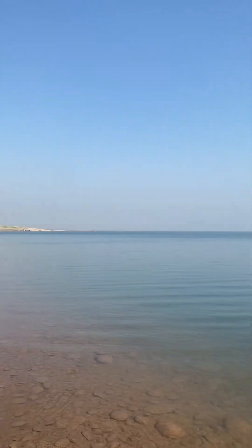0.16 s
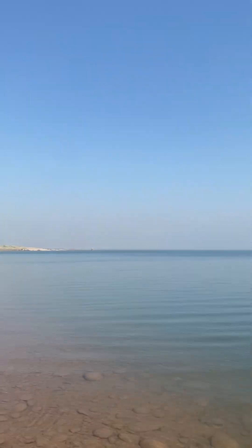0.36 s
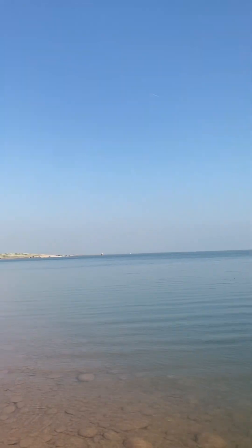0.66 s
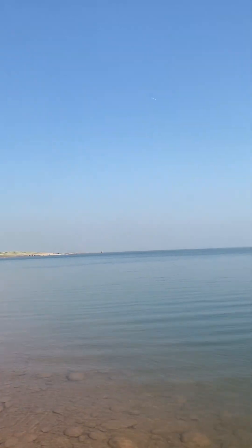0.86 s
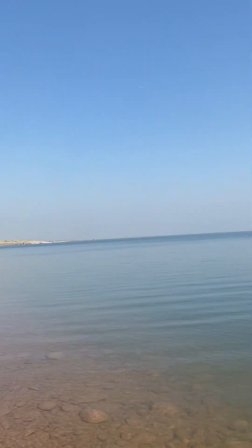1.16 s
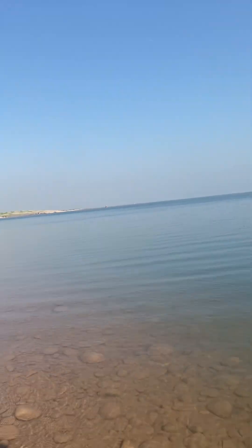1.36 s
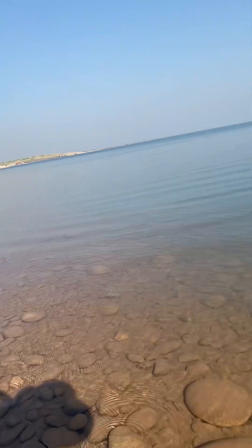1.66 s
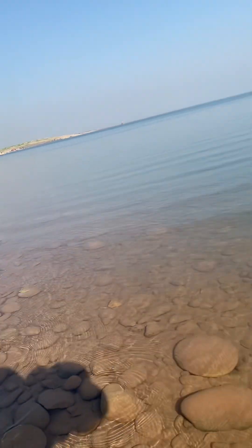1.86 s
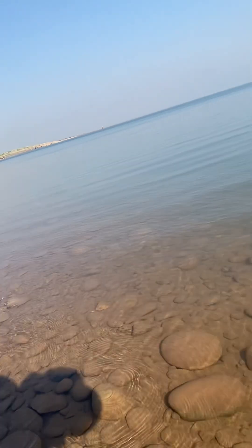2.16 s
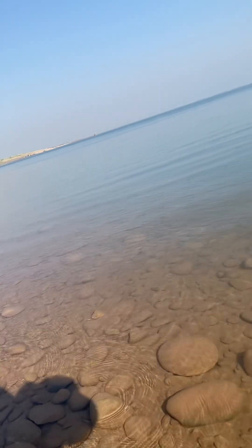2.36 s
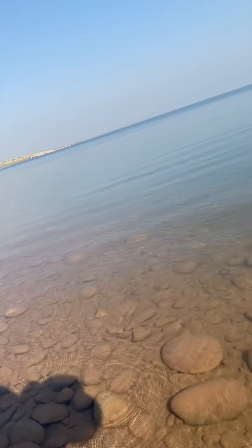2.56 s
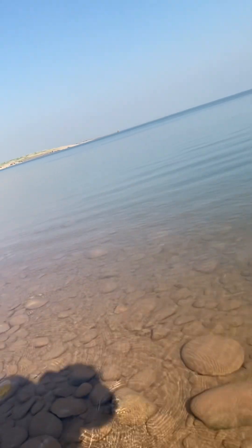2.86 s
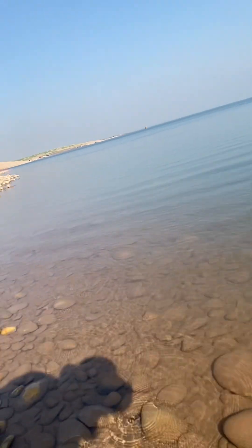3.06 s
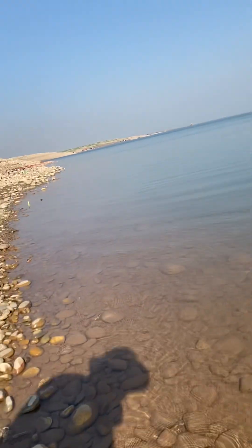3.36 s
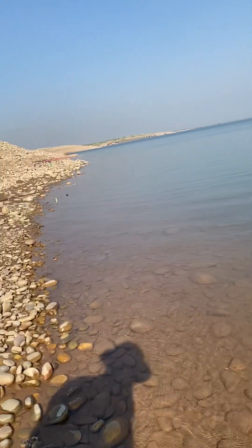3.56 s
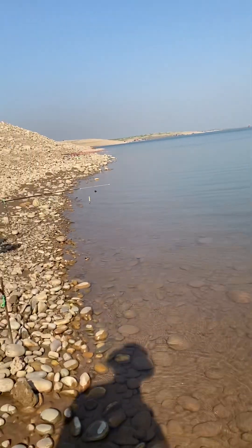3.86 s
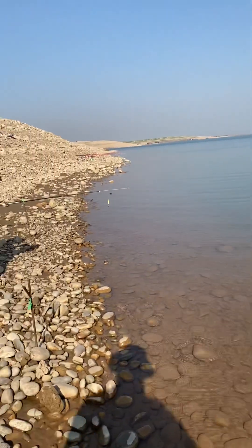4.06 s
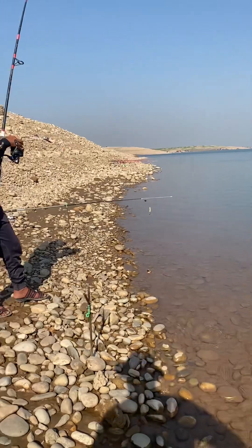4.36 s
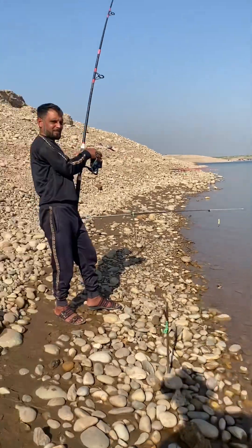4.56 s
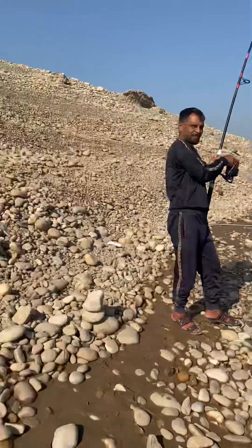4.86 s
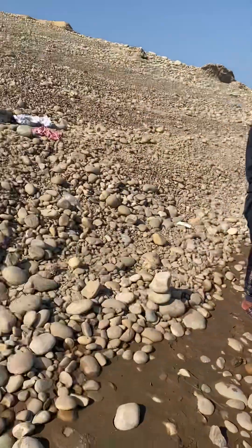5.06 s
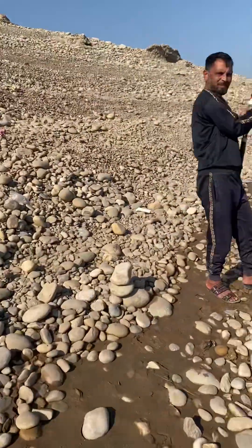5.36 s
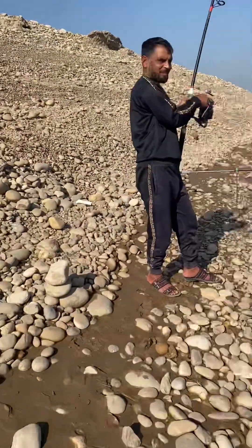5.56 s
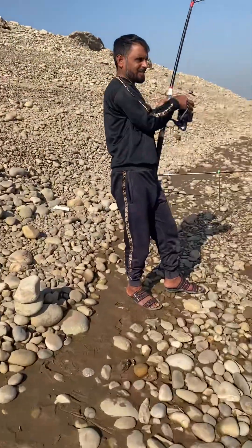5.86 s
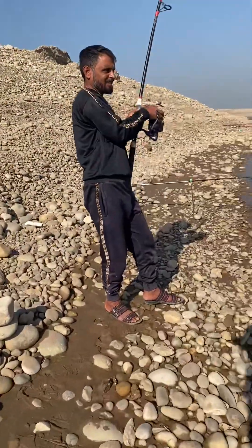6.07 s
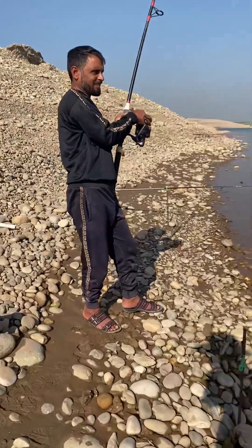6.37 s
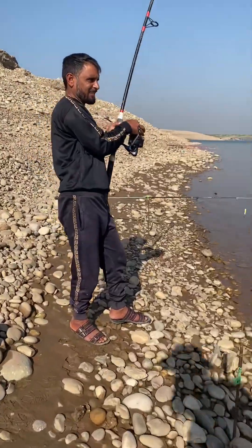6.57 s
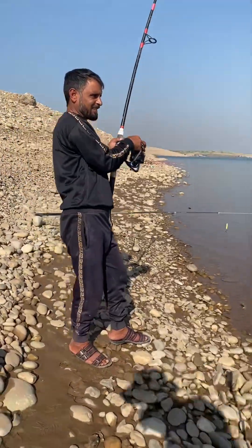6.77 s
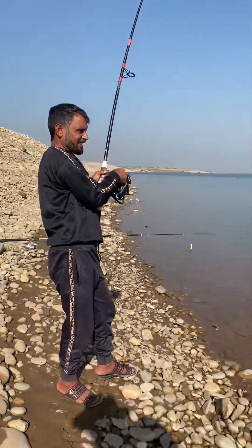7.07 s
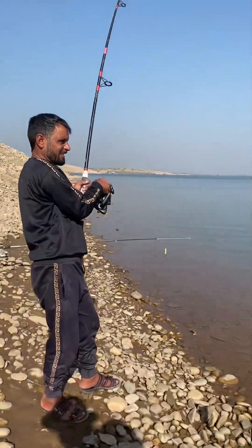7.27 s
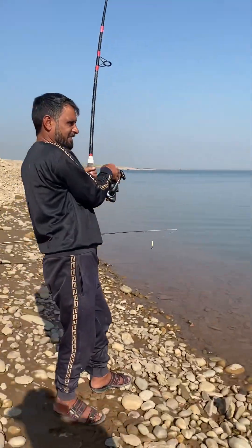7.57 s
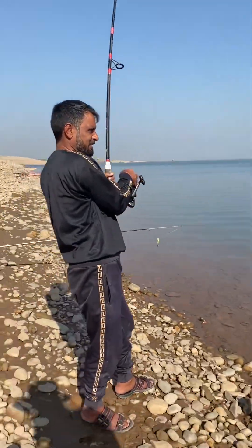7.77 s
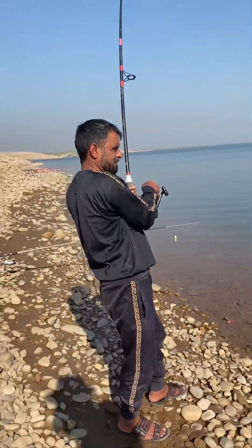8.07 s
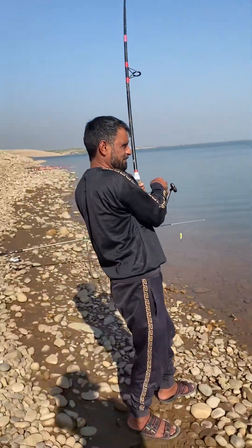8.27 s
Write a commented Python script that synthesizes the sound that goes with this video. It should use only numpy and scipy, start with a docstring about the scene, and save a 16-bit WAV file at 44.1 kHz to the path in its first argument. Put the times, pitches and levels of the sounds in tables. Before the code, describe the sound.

Close by, a fishing reel ticks in a rapid metallic ratchet that slows and speeds up while feet stir shallow water and stones knock. The clicking stops, leaving thin wavering squeaks and a low breeze. Splashing steps and plops follow, then crunching shingle with loud stone clacks as the reel winds again, longer and quicker. Outdoors on a quiet lakeshore, hand-held phone microphone with soft wind rumble.

```python
"""Fishing reel on a pebble lakeshore

The ratchet of a reel ticks in two short goes, later in a long quicker one: each tooth strikes ringing modes.
Feet wade out of the shallows (swarms of bubbles, spray, plops) and crunch over shingle (many tiny taps).
Single stones clack as short modes or grate in jerks, dull sounds thud as damped tones with noise,
and thin squeaks come and go as wavering tones; faint bright sizzles are unevenly pattering noise.
A light breeze, made of filtered noise, rumbles on the two ports of a hand-held phone.
"""
import sys
import numpy as np
from scipy import signal
from scipy.fft import rfft, irfft, next_fast_len
from scipy.io import wavfile
from scipy.ndimage import uniform_filter1d

SR = 44100
rng = np.random.default_rng(int(sys.argv[2]) if len(sys.argv) > 2 else 0)


def persist_wave(psi):
    """Save psi, clipped to +-1, as 16-bit WAV."""
    counts = np.round(np.clip(psi, -1, 1) * 32767).astype(np.int16)
    wavfile.write(sys.argv[1], SR, np.atleast_2d(counts).T)


N = 371763
TIME = np.arange(N) / SR  # seconds

# How the body of the reel rings, as pairs of close tones.
# Each row: middle of the pair in Hz, width in Hz, average relative level in dB.
REEL_MODES = [(1020, 89, 9), (1316, 47, 7), (2200, 510, 6), (3110, 120, 8.5), (4110, 520, 12),
              (5370, 660, 8.5), (7170, 970, 3.5), (9670, 314, 14), (10310, 1900, 12), (12800, 1600, 7.5),
              (15040, 330, 6)]


def reel(level_db=1.0, snap_t60=0.014, bounce_s=0.0044, bounce_db=-9, body_t60=0.17, body_db=-22,
         steady=0.36, loose=0.51, colour_db=1.7, split=0.34):
    """The pawl drops over each tooth: a sharp snap, one small bounce, then the housing rings on."""
    teeth = ratchet() * undb(level_db)
    t = TIME[:SR // 8]
    bounce = undb(bounce_db) * (t > bounce_s) * fade(np.abs(t - bounce_s), snap_t60)
    decay = fade(t, snap_t60) + bounce + undb(body_db) * fade(t, body_t60)

    # every tooth sounds much the same, but the loose pawl chatters differently each time
    alike = signal.fftconvolve(teeth[None], noise(len(t), 0.078) * decay)[:, :N]
    chatter = signal.fftconvolve(teeth, decay)[:N] * noise(N, 0.53)
    blows = steady * alike + loose * chatter

    # the modes come in close pairs, split by a share of their width; each tooth favours other ones
    tooth = np.cumsum(teeth != 0)
    ring = 0
    for hz, width, db in REEL_MODES:
        for side in (-1, 1):
            favour = undb(db + colour_db * rng.standard_normal(tooth[-1] + 1))
            mode = resonate(blows, hz + side * split * width, width)
            ring = ring + side * favour[tooth] * mode / 2

    # so small a body radiates no bass
    return signal.sosfilt(signal.butter(2, 850, "high", fs=SR, output="sos"), ring)


# The handle is nudged by a single tooth.
# Each row: start in seconds, relative level in dB.
NUDGES = [(0.9562, -39), (2.2366, -39.5), (2.327, -42.5), (2.4368, -54.5), (2.7565, -47.5), (3.1084, -43.5),
          (5.494, -40), (6.2657, -38.5), (6.348, -36.5)]
# The reel is wound in three goes, each a curve.
# Each row: time in seconds, teeth per second, relative level of a tooth in dB.
FIRST_WIND = [(0.01, 53.5, -39.0), (0.137, 37.5, -36.0), (0.301, 30.9, -34.0), (0.422, 10.7, -37.0),
              (0.661, 15.4, -36.0), (0.704, 33.0, -38.0), (0.734, 22.9, -39.0), (0.881, 20.9, -40.0)]
SLOW_WIND = [(0.987, 16.9, -38.0), (1.049, 14.7, -37.0), (1.288, 34.8, -37.0), (1.46, 13.4, -39.0)]
QUICK_WIND = [(6.7, 15.2, -35.0), (6.784, 23.0, -33.0), (7.004, 81.6, -37.5), (7.102, 60.8, -36.5),
              (7.371, 51.7, -37.5), (7.553, 32.4, -40.5), (7.67, 32.8, -41.5), (7.857, 59.9, -41.0),
              (8.051, 20.0, -45.0)]
TOOTH_SCATTER_DB = 0.8  # how unequal the blows of a winding are
PAWL_FALL_S = .0007  # from the tip of a tooth to the blow


def ratchet():
    """One blow for each tooth that passes the pawl: the faster the handle, the closer the blows."""
    teeth = np.zeros(N)
    for start, db in NUDGES:
        teeth[int(start * SR)] += undb(db)
    for go in (FIRST_WIND, SLOW_WIND, QUICK_WIND):
        turning = (TIME >= go[0][0]) & (TIME < go[-1][0])
        teeth_passed = np.cumsum(curve(go) * turning) / SR
        drops = np.flatnonzero(np.diff(np.ceil(teeth_passed)))
        scatter_db = TOOTH_SCATTER_DB * rng.standard_normal(len(drops))
        teeth[drops + int(PAWL_FALL_S * SR)] += undb(curve(go, column=2)[drops] + scatter_db)
    return teeth


# A leg pushes through the shallows.
# Each row: height of the push in seconds, relative level in dB, length in seconds.
STRIDES = [(0.4, -60.5, 0.25), (0.54, -54, 0.33), (1.05, -55, 0.092), (1.33, -55.5, 0.64),
           (2.1, -70.5, 0.42), (4.16, -66.5, 0.33), (4.36, -61.5, 0.14), (4.86, -50, 0.31),
           (5.11, -54, 0.21), (5.35, -47, 0.21), (5.5, -55, 0.26), (5.92, -65.5, 0.56), (6.25, -61.5, 0.31)]
# The colour of stirred water and spray.
# Each row: frequency in Hz, relative gain in dB.
SPRAY = [(150, -3), (350, 3), (700, -6), (1500, -2), (2100, 0.5), (3000, -7), (4200, -1), (5800, -2),
         (8000, -9.5), (13000, -10.5), (16000, -28)]


def wading(cycles=24, spray_db=-2, patter_db=3.0, low_hz=560, high_hz=4000, count=2600):
    """Stirred water: a swarm of small bubbles, the smaller the shorter, under pattering spray."""
    swarm = np.zeros((2, N))
    for when, pitch in rng.random((count, 2)):
        hz = low_hz * (high_hz / low_hz) ** pitch
        add(swarm, when * N / SR, bubble(hz, cycles / hz) * np.sqrt(hz / low_hz))

    # spray lands in uneven splashes a few milliseconds long
    unevenness = unit(uniform_filter1d(rng.standard_normal(N), size=180))
    patter = undb(patter_db * unevenness)
    spray = unit(colour(noise(N, 0.021) * patter, SPRAY)) * undb(spray_db)
    push = swells(STRIDES, rise_share=0.53, edge_db=13.5, roundness=1.28)
    return unit(unit(colour(swarm, SPRAY)) + spray) * push


def bubble(hz, t60, rise=0.26, port_spread=1.0):
    """A bubble rings and rises in pitch as it nears the surface."""
    t = TIME[:int(t60 * SR)]
    phase = 2 * np.pi * np.cumsum(hz * (1 + rise * t / t60)) / SR
    tone = np.sin(phase + port_spread * rng.standard_normal((2, 1)))
    return tone * fade(t, t60) * (1 - np.exp(-t * hz))


# Bubbles around the feet in the shallows.
# Each row: start in seconds, relative level in dB, starting pitch in Hz.
BUBBLES = [(0.518, -41, 1415), (1.053, -40, 1415), (1.154, -33.5, 503), (1.221, -37, 473),
           (1.352, -46, 760), (1.467, -43.5, 1245), (1.484, -48, 2450), (1.6, -51, 790), (1.626, -54, 2660),
           (1.63, -46.5, 674), (2.413, -56.5, 1570), (4.145, -51.5, 1370), (4.557, -44, 760),
           (4.582, -43.5, 1160), (4.603, -39.5, 657), (4.628, -45, 2390), (4.770, -40, 1860),
           (5.129, -50, 1800), (5.143, -38, 1520), (5.453, -41, 1900), (5.5, -37, 1934),
           (5.857, -39.5, 1300), (5.873, -50, 2440), (5.987, -53, 2690), (6.012, -49, 1710),
           (6.064, -45, 1630), (6.199, -51, 3840)]
PLOP_T60_S = 0.06  # ring time of a 1 kHz bubble; it shortens with the root of the pitch


def bubbles(level_db=2, rise=0.367, gurgle=0.4):
    """The larger single plops: the lower, the longer they ring; the moving water makes them gurgle."""
    out = np.zeros((2, N))
    for start, db, hz in BUBBLES:
        plop = bubble(hz, PLOP_T60_S * np.sqrt(10 ** 3 / hz), rise)
        flutter = unit(uniform_filter1d(rng.standard_normal(plop.shape[-1]), size=110))
        swell = 1 - np.exp(-TIME[:len(flutter)] * hz / 2)
        add(out, start, plop * swell * (1 + gurgle * flutter) * undb(db + level_db))
    return out


# Faint bright sizzle: high overtones and ticks of the squeaks at 2 s, later fine drops.
# Each row: loudest moment in seconds, relative level in dB, length in seconds.
SIZZLES = [(2.08, -76.5, 0.89), (4.845, -56, .05), (5.33, -61.5, 0.52)]


def bright_sizzle(patter_db=5.0):
    """Treble of the squeaks at 2 s and of later fine drops: high-passed noise with an uneven patter."""
    unevenness = unit(uniform_filter1d(rng.standard_normal(N), size=90))
    pattering = noise(N, 0.14) * undb(patter_db * unevenness)
    sizzle = signal.sosfilt(signal.butter(4, 8500, "high", fs=SR, output="sos"), pattering)
    return unit(sizzle) * swells(SIZZLES, rise_share=0.29, edge_db=13, roundness=2.0)


# A sole presses or drags on the shingle.
# Each row: moment of the greatest weight in seconds, relative level in dB, length in seconds.
SCUFFS = [(4.59, -65, 0.28), (4.76, -53, 0.54), (6.605, -53, 0.083), (6.9, -55.5, 0.73), (7.44, -49, 0.076),
          (7.495, -41.5, 0.038), (7.56, -49.5, 0.064), (7.66, -47, 0.2), (7.695, -44, 0.022), (7.8, -59, 1),
          (8.225, -49, 0.13), (8.295, -53, 0.097), (8.42, -46.5, 0.049)]
# The colour of the crunching stones and sand.
# Each row: frequency in Hz, relative gain in dB.
SHINGLE = [(150, -1), (350, 2), (650, -3), (1100, -3), (1900, -1.5), (3000, -11.5), (3900, -8.5),
           (6000, -18), (8000, -30), (10000, -22.5), (16000, -32)]


def shingle(per_second=700, spread_db=5.5, sand_db=-5, count=14):
    """Many small pebbles of all sizes tap each other, with sand scraping between them."""
    taps = np.zeros((2, N))
    t = TIME[:SR // 30]
    for hz in np.geomspace(600, 6000, count):
        hits = rng.random(N) < per_second / count / SR
        sizes = undb(spread_db * np.minimum(rng.exponential(size=N), 3.5))
        burst = noise(len(t), 0.6) * fade(t, 0.027)
        tap = unit(burst) + unit(resonate(burst, hz, hz / 9)) * np.sqrt(hz / 3000)
        taps += signal.oaconvolve((hits * sizes)[None], tap)[:, :N]
    sand = unit(colour(noise(N, 0.37), SHINGLE))
    weight = swells(SCUFFS, rise_share=0.4, edge_db=11.0, roundness=1.26)
    return unit(unit(colour(taps, SHINGLE)) + undb(sand_db) * sand) * weight


# Stones knocked together; the softer the contact, the lower the top frequency.
# Each row: start in seconds, relative level in dB, basic pitch in Hz, top frequency in Hz.
KNOCKS = [(0.453, -28.5, 1934, 5330), (0.479, -34, 1870, 4200), (1.15, -29, 2260, 5330),
          (1.177, -42, 1300, 2200), (4.811, -36, 1400, 3000), (4.84, -37, 1340, 5240),
          (4.924, -40, 1910, 3000), (5.076, -39, 4080, 5500), (5.235, -36.5, 3210, 4290),
          (5.318, -38, 3020, 3800), (5.352, -32, 2180, 5500), (5.371, -34.5, 1810, 4830),
          (5.823, -43.5, 2430, 4500), (5.856, -37.5, 1320, 2190), (6.258, -46, 1410, 2490),
          (7.4306, -21, 1800, 2200), (7.4408, -14, 1900, 2400), (8.2912, -13.5, 1712, 4800),
          (7.534, -35, 2000, 2300), (7.749, -25.5, 1970, 1950), (8.178, -34.5, 1870, 5400),
          (8.221, -34.5, 1540, 4200), (8.252, -34, 1850, 4500), (8.279, -47, 1820, 4600),
          (8.4, -38.5, 1880, 5070)]


def stones(level_db=-1):
    """The louder single knocks; a soft contact takes the top off."""
    out = np.zeros((2, N))
    for start, db, hz, top_hz in KNOCKS:
        contact = signal.butter(3, top_hz, fs=SR, output="sos")
        add(out, start, signal.sosfilt(contact, clack(hz)) * undb(db + level_db))
    return signal.sosfilt(signal.butter(6, 5800, fs=SR, output="sos"), out)


# How a pebble rings.
# Each row: multiple of its basic pitch, relative level in dB, time to fade by 60 dB in seconds.
PEBBLE_MODES = [(.64, 0.5, 0.01), (1, 7.5, 0.015), (1.28, -2, 0.026), (1.72, 10.5, 0.0018),
                (2.12, 12.5, 0.0054), (2.9, 3, 0.0057)]


def clack(hz, grit_db=-9, grit_t60=0.049, bed_db=-27, bed_t60=0.062):
    """One pebble struck: a few short modes, grit at the contact, a faint rattle of its neighbours."""
    t = TIME[:SR // 10]
    ring = 0
    for multiple, db, t60 in PEBBLE_MODES:
        pitch = hz * multiple * (1 + 0.02 * rng.standard_normal())
        phase = 2 * np.pi * pitch * t + .3 * rng.standard_normal((2, 1))
        ring = ring + undb(db) * fade(t, t60) * np.sin(phase)
    grit = unit(resonate(resonate(noise(len(t), 0.73), 2370, 2100), 2200, 3600))
    grit_decay = undb(grit_db) * fade(t, grit_t60) + undb(bed_db) * fade(t, bed_t60)
    return (ring / 2 + grit * grit_decay) * (1 - np.exp(-t / 0.00056))


# One stone drags over another.
# Each row: start in seconds, relative level in dB, pitch in Hz, length of the drag in seconds.
GRATES = [(2.07, -68, 2480, 0.081), (2.211, -57, 2700, 0.0058), (5.113, -50.5, 2930, 0.014),
          (5.352, -35, 3680, 0.0051), (7.422, -37, 1470, 0.018), (7.647, -38.5, 3840, 0.028),
          (7.658, -41, 1030, 0.036), (8.392, -41.5, 3560, 0.023)]


def grates(level_db=-2, per_second=260, slip_t60=0.018, width=0.24, tail_t60=0.093):
    """One stone drags over another in quick jerks that ring it in a broad band."""
    out, t = np.zeros((2, N)), TIME[:SR // 8]
    for start, db, hz, length in GRATES:
        rub = noise(len(t), 0.74) * slips(len(t), per_second, slip_t60, scatter_db=-6)
        ring = unit(resonate(resonate(rub, hz, width * hz), hz, width * hz))
        push = np.minimum(t / (0.5 * length), 1) * fade(np.maximum(t - length, 0), tail_t60)
        add(out, start, undb(db + level_db) * ring * push)
    return out


# Low dull sounds: thuds of feet, a deep wind buffet at 4.45 s, a water plop at 4.91 s.
# Each row: start in seconds, relative level in dB, pitch in Hz, time to fade by 60 dB in seconds.
DULL_SOUNDS = [(1.254, -37.5, 67, 0.2), (1.414, -38.5, 73, 0.12), (1.579, -44, 62, 0.086),
               (4.414, -32, 52, 0.15), (4.451, -45, 37.5, 0.2), (4.908, -43, 550, 0.023),
               (4.966, -28.5, 210, 0.014), (4.964, -46, 667, 0.025), (6.04, -50, 270, 0.07),
               (7.434, -41.5, 335, 0.074), (7.659, -48.5, 430, 0.09), (8.294, -40, 219, 0.06)]


def dull_sounds(rough=1.0):
    """Foot thuds, one wind buffet and one plop: a damped tone mixed with noise around the same pitch."""
    out, t = np.zeros((2, N)), TIME[:SR // 3]
    for start, db, hz, t60 in DULL_SOUNDS:
        rumble = unit(resonate(resonate(noise(len(t), 0.18), hz, hz), hz, hz))
        body = np.sin(2 * np.pi * hz * t) + rough * rumble
        onset = 2 * (1 - np.exp(-t * hz))
        add(out, start, undb(db) * body * fade(t, t60) * onset)
    return out


# Short squeaks.
# Each row: start in seconds, relative level in dB, middle pitch in Hz, length in seconds,
# roughness from 0 to 1 (anything higher counts as 1).
SQUEAKS = [(1.987, -53, 3260, 0.013, 0.4), (2.003, -46.5, 3710, 0.026, 0.45),
           (2.025, -43.5, 3780, 0.036, 0.4), (2.077, -51, 3490, 0.065, 0.46),
           (2.181, -42, 3970, 0.032, 0.3), (2.249, -36, 4000, 0.012, 0.14), (2.285, -47, 3980, 0.038, 0.52),
           (2.702, -53, 4190, 0.022, 0.87), (2.946, -58, 4360, 0.033, 0.34), (3.223, -55, 4380, 0.036, 0.4),
           (3.286, -48.5, 4330, 0.12, 0.68), (3.338, -47, 4250, 0.04, 0.57),
           (3.371, -48.5, 4080, 0.034, 0.45), (3.412, -44.5, 4200, 0.013, 0),
           (3.474, -53, 4220, 0.018, 0.2), (3.575, -32.5, 4240, 0.032, 0.3),
           (3.591, -47, 4360, 0.057, 0.55), (3.698, -47.5, 4420, 0.061, 0.47),
           (3.753, -62, 4520, 0.11, 0.77), (4.212, -51, 4360, 0.13, 0.52),
           (4.673, -42.5, 4980, 0.048, 0.87), (4.674, -39, 4380, 0.022, .7), (4.694, -36, 4260, 0.037, 0.2),
           (4.747, -40, 4920, 0.0095, 1.1), (2.197, -65.5, 1270, 0.18, 0.54)]
SQUEAK_TAIL_T60_S = .2  # fading of the faint tail by 60 dB


def squeaks(waver=0.023, droop=0.028, per_second=85, slip_t60=0.051, rasp_width=0.12,
            tick_db=-12, overtone_db=-24, tail_db=-23, port_lead=1.15):
    """A slightly falling tone that, when rough, breaks into a fluttering rasp, each jerk with a tick."""
    out, t = np.zeros((2, N)), TIME[:SR // 5]
    for start, db, hz, length, rough in SQUEAKS:
        rough = np.clip(rough, 0, 1)
        progress = np.minimum(t / length, 1)
        jerks = slips(len(t), per_second, slip_t60, scatter_db=2)

        wobble = unit(uniform_filter1d(rng.standard_normal(len(t)), size=200))
        pitch = hz * (1 + waver * rough * wobble + droop * (.5 - progress))
        # the left port leads by port_lead radians, give or take
        port_phase = np.array([[port_lead], [0]]) + .5 * rng.standard_normal((2, 1))
        phase = 2 * np.pi * np.cumsum(pitch) / SR + port_phase

        # every jerk throws the tone out of step and spreads it into a band
        kicks = rng.standard_normal((2, len(t))) * jerks
        band = signal.butter(4, rasp_width * hz / 2, fs=SR, output="sos")
        rasp = unit(signal.sosfilt(band, kicks)) / np.sqrt(2)
        flutter = 1 - rough + rough * (rasp[0] + 1j * rasp[1])
        tone = np.imag(flutter * (np.exp(1j * phase) + undb(overtone_db) * np.exp(2.2j * phase)))

        ticks = noise(len(t), 0.87) * jerks ** 2
        for _ in range(2):
            ticks = resonate(ticks, 1.096 * hz, 0.24 * hz)
        tail = undb(tail_db) * progress * fade(t, SQUEAK_TAIL_T60_S)
        push = np.sin(np.pi * progress ** 0.43) + tail
        add(out, start, undb(db) * (tone + undb(tick_db) * rough * unit(ticks)) * push)
    return out


# Strength of the breeze on the phone.
# Each row: time in seconds, relative level in dB.
WIND = [(0.0, -66), (0.55, -60.5), (1.08, -63), (1.16, -52.5), (1.45, -47), (1.7, -57.5), (3.1, -58.5),
        (4.2, -53), (4.46, -48.5), (5.0, -56.5), (6.6, -58), (7.5, -53.5), (8.43, -60)]
# The colours of the wind's rumble and of the lake's wash.
# Each row: frequency in Hz, relative gain in dB.
RUMBLE = [(20, -20.5), (35, -1.5), (62, 2), (140, -9), (450, -22), (900, -42.5), (2000, -49), (8000, -89)]
AIR = [(30, -20), (200, 1.5), (400, -2.5), (1600, -20), (6000, -31), (10000, -34.5), (16000, -37.5)]


def breeze(rumble_db=-1, air_db=-68):
    """Wind buffets the phone over the quiet wash of the open lake."""
    rumble = unit(colour(noise(N, 0.1), RUMBLE)) * undb(curve(WIND) + rumble_db)
    wash = unit(colour(noise(N, 0.59), AIR)) * undb(air_db)
    return rumble + wash


def swells(rows, rise_share, edge_db, roundness):
    """Each swell builds to its peak and dies away, edge_db down at both ends of its length."""
    power = np.zeros(N)
    for peak, db, length in rows:
        near = np.abs(TIME - peak) < 2 * length
        t = (TIME[near] - peak) / length
        away = np.maximum(-t / rise_share, t / (1 - rise_share))
        power[near] += undb(db - edge_db * away ** roundness) ** 2
    return np.sqrt(power)


def slips(size, per_second, t60, scatter_db):
    """Stick and slip: uneven jerks that each die away; rms 1."""
    gaps, sizes = rng.random(64), rng.standard_normal(64)
    moments = np.cumsum(np.r_[0, .5 + gaps[1:]]) / per_second
    at = (moments * SR).astype(int)
    jerks = np.zeros(size)
    jerks[at[at < size]] = undb(scatter_db * sizes[at < size])
    return unit(signal.lfilter([1], [1, -fade(1 / SR, t60)], jerks))


def undb(db):
    """Decibels to gain."""
    return 10 ** (np.asarray(db) / 20)


def unit(x):
    """Scale to rms 1."""
    return x / np.sqrt(np.mean(x ** 2))


def curve(rows, column=1):
    """One column of a control table at every sample."""
    rows = np.array(rows)
    return np.interp(TIME, rows[:, 0], rows[:, column])


def fade(t, t60):
    """Exponential decay, 60 dB down after t60 seconds."""
    return np.exp(-np.log(1000) * t / t60)


def noise(size, apart):
    """Stereo noise of rms 1; the larger apart is, the more the two ports differ."""
    mid, side = rng.standard_normal((2, size))
    return unit(np.array([mid + apart * side, mid - apart * side]))


def colour(x, points):
    """Causal (minimum-phase) filter with the given gains, each point (Hz, dB)."""
    size = next_fast_len(x.shape[-1] + 4096, True)
    hz, db = np.transpose(points)
    log_hz = np.log(np.fft.rfftfreq(size, 1 / SR) + 1)  # + 1 avoids the logarithm of zero
    log_gain = np.log(undb(np.interp(log_hz, np.log(hz), db)))
    # folding the cepstrum forward in time makes the filter causal
    cepstrum = irfft(log_gain, size)
    cepstrum[1:size // 2] *= 2
    cepstrum[size // 2 + 1:] = 0
    return irfft(rfft(x, size) * np.exp(rfft(cepstrum)), size)[..., :x.shape[-1]]


def resonate(x, hz, width_hz):
    """One resonance, gain 1 at its centre."""
    return signal.lfilter(*signal.iirpeak(hz, hz / width_hz, fs=SR), x)


def add(out, start, sound):
    """Mix a short sound in at the given time in seconds."""
    i = max(int(start * SR), 0)
    out[:, i:i + sound.shape[-1]] += sound[..., :N - i]


def lead(x, points):
    """Let the left port lead the right by the given phases, each point (Hz, radians)."""
    shift = np.interp(np.fft.rfftfreq(N, 1 / SR), *np.transpose(points))
    return np.array([x[0], irfft(rfft(x[1]) * np.exp(-1j * shift), N)])


# Where the dry steps are heard.
# Each row: time in seconds, extra level of left over right in dB.
BEARING = [(6.3, 2), (7.45, -2.5), (8.4, -2.5)]
# Sound from the feet bends round the phone and reaches the left port late.
# Each row: frequency in Hz, phase by which the left leads in radians.
FOOT_PHASE = [(0, 0), (350, -.3), (600, -2.8), (950, -4.5), (1500, -6), (2400, -6.28)]


def scene():
    """Reel, feet, water, squeaks and wind together."""
    pan = undb(curve(BEARING) * np.array([[1], [-1]]) / 2)
    steps = pan * lead(stones() + grates() + shingle(), FOOT_PHASE)
    water = wading() + bubbles()
    return reel() + steps + dull_sounds() + water + bright_sizzle() + squeaks() + breeze()


# The two ports fall in and out of step up the treble.
# Each row: frequency in Hz, phase by which the left leads in radians.
PORT_PHASE = [(0, 0), (1600, -.2), (2400, .5), (5400, .5), (6500, 3), (8100, 3.3), (9200, 6.2),
              (11600, 6.5), (12400, 9.2), (14400, 9.5), (15400, 12.3)]
TOP_HZ = 16200  # the phone keeps nothing much above this


def record(dry):
    """The phone's ports shift the treble against each other, and the top is cut."""
    top_cut = signal.ellip(8, .2, 70, TOP_HZ, fs=SR, output="sos")
    return signal.sosfilt(top_cut, lead(dry, PORT_PHASE))


dry = scene()
out = record(dry)
persist_wave(out)
```